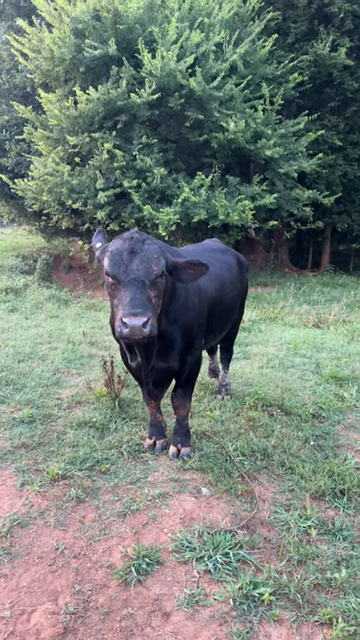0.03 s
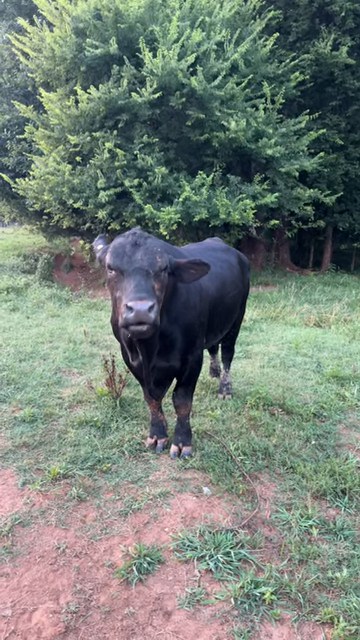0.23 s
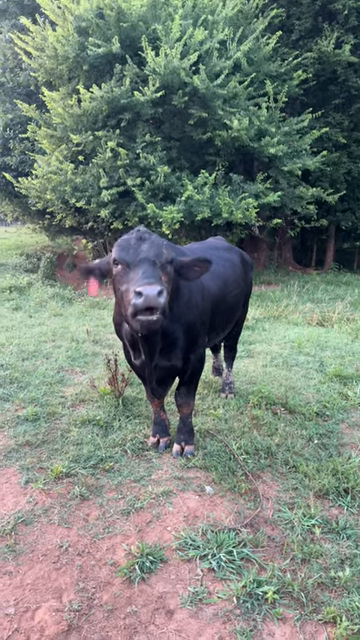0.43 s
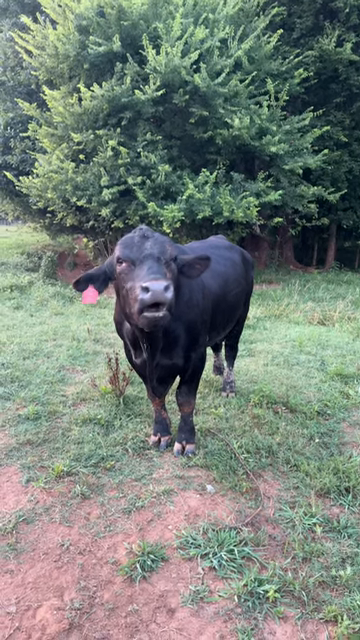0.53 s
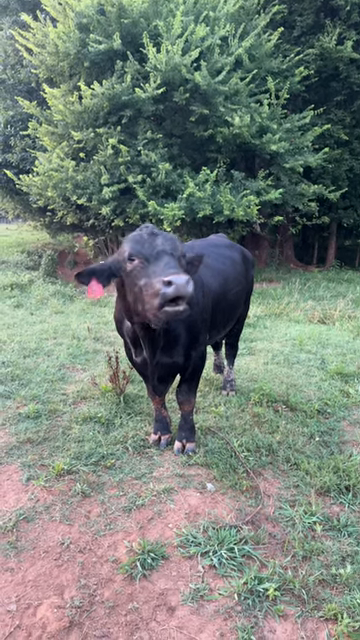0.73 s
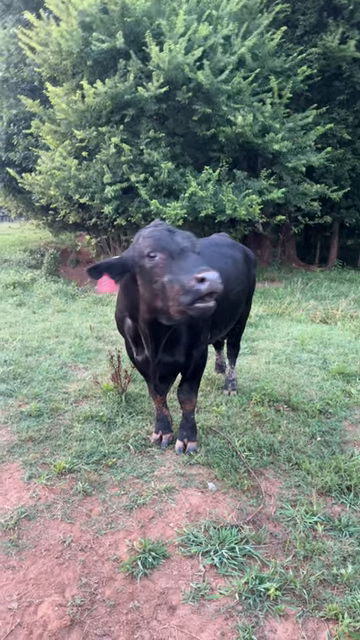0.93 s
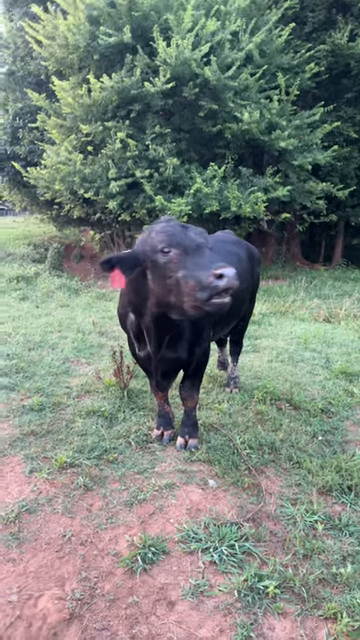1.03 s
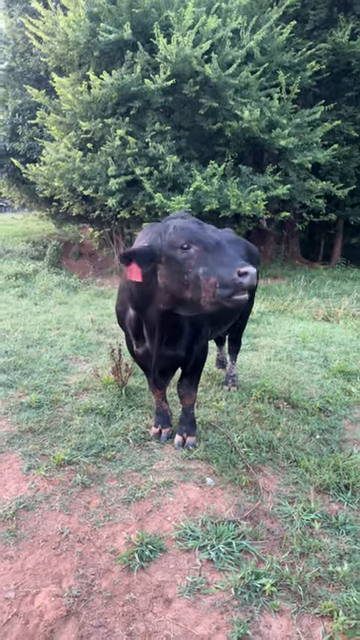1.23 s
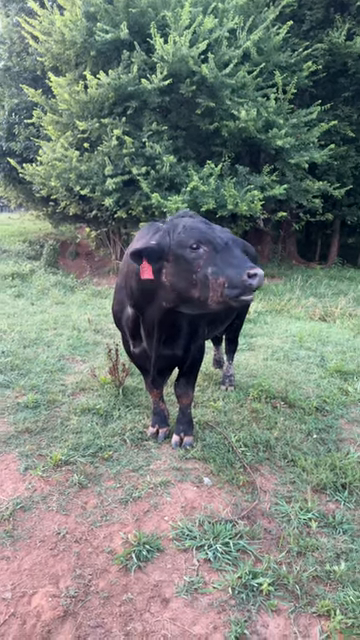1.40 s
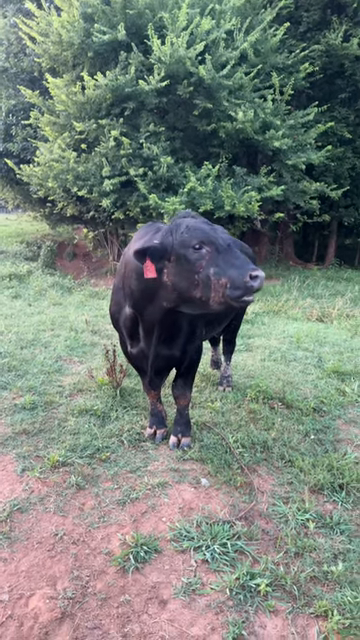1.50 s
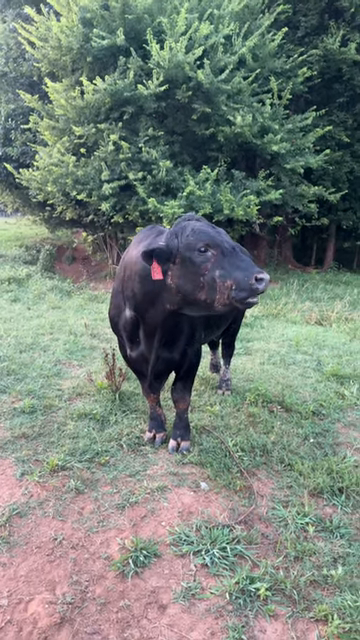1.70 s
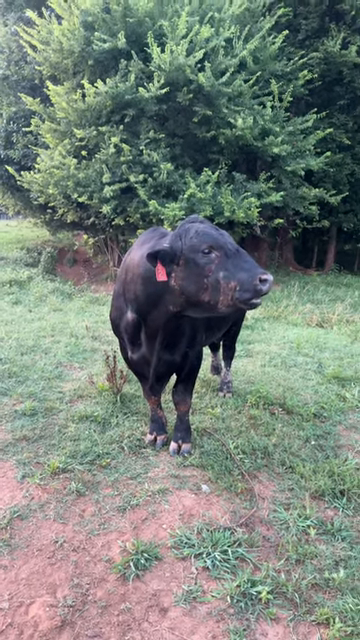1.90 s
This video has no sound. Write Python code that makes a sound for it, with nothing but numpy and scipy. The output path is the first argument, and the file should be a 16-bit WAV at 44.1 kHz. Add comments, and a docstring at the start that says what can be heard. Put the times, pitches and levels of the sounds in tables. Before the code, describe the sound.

A bull bellows once a few metres away in an open pasture, starting rough, holding a deep booming note and ending in a short rattle. Faint insect hiss and a distant engine continue, and a bird chirps twice.

```python
"""A pasture: one bull bellows a few metres away. A soft closed-mouth hum and a wet lip click lead to
a rough onset, a long booming note that sags as the mouth closes, and a short rattle on release.
Vocal-fold pulses and turbulent air ring the throat and nose; slack folds flap to make the growls.
Behind it a bird slurs down twice, an animal calls far off, insects hiss and a distant engine drones."""
import sys
import numpy as np
from scipy import signal
from scipy.fft import rfft, irfft
from scipy.io import wavfile

SR = 44100
rng = np.random.default_rng(int(sys.argv[2]) if len(sys.argv) > 2 else 0)


def master_out(mix):
    """Clip the mix to full scale and print it as 16-bit PCM to the path in sys.argv[1]."""
    frames = np.transpose(np.atleast_2d(mix))
    ceiling = np.clip(frames, -1, 1)
    pcm = np.round(ceiling * 32767).astype(np.int16)
    wavfile.write(sys.argv[1], SR, pcm)


N = 85995
T = np.arange(N) / SR

# Open air and insect spectrum: freq_hz, gain_db
FIELD_SPECTRUM = [(33, -32.5), (42, -9.5), (52, 12.5), (110, 2.5), (200, 5), (340, -7.5), (600, -4),
                  (1000, -11.5), (1800, -18.5), (2800, -18.5), (4300, -9.5), (5000, -18.5), (5800, -13.5),
                  (6800, -30.5), (8300, -23), (10000, -36.5), (15500, -52)]
# Engine partials: freq_hz, level_db
ENGINE_PARTIALS = [(77.4, -57), (102.7, -50.5), (128.6, -57.5), (155, -63.5), (204, -62.5)]
# Bird slurs: start_s, length_s, from_hz, to_hz, level_db
BIRD_SLURS = [(1.342, .046, 2970, 2230, -59.5), (1.691, .066, 3080, 2040, -58)]
# Far animal hoots: start_s, length_s, peak_pitch_hz, level_db
HOOTS = [(1.686, 0.082, 283, -58), (1.779, 0.042, 267, -64.5)]
# Hoot partials: pitch_ratio, gain_db
HOOT_PARTIALS = [(2, 7.5), (4, 0), (4.85, -3.5)]

# Vocal-fold pitch: time_s, pitch_hz
FOLD_PITCH = [(.16, 93.6), (.2, 100.7), (.25, 105.8), (.31, 108), (.38, 109.6), (.48, 110.3), (.62, 109.5),
              (.84, 107.3), (.96, 105.5), (1.08, 103.6), (1.16, 100.9), (1.2, 99.3), (1.228, 93.4),
              (1.255, 88)]
# Vocal effort and mouth opening: time_s, effort_db, open_fraction
EFFORT_AND_MOUTH = [(.17, -64, 0.4), (.22, -1.5, 0.16), (.3, 0.5, 0.29), (.39, 3.5, 0.58), (.47, 4.5, 0.65),
                    (.62, 1, 1), (.85, 1, 1), (.97, 1, 0.79), (1.08, -0.5, 0.64), (1.16, -1.5, 0.44),
                    (1.21, 1.5, 0), (1.25, -4, 0), (1.27, -43, 0.13)]
# Lip whistle bands: centre_hz, gain_db
WHISTLE_BANDS = [(5480, -65.5), (8800, -70), (12850, -74)]
# Lip whistle envelope: time_s, gain_db
WHISTLE_ENVELOPE = [(1.125, -21.5), (1.15, 4.5), (1.22, -8.5), (1.28, -13.5)]
# Wet mouth smacks: start_s, level_db, decay_s, highpass_hz
SMACKS = [(0.121, -42, 0.014, 1810), (0.134, -46, 0.019, 917), (1.136, -60, 0.049, 4930),
          (1.35, -71, 0.11, 7000)]
# Smack spectrum: freq_hz, gain_db
SMACK_SPECTRUM = [(500, -9), (1000, -4), (1380, 13.5), (1650, -5), (2400, 7.5), (3200, -20.5), (4300, -7.5),
                  (8500, -10), (12000, -15.5), (15500, -19.5)]
# Throat resonance flares: start_s, length_s, freq_hz, level_db
GRUNT_FLARES = [(.174, 0.016, 1095, -34), (0.182, 0.021, 545, -24.5), (0.193, 0.02, 1076, -34.5),
                (0.23, 0.052, 750, -28.5), (.462, 0.079, 186.5, -31), (1.286, 0.039, 763, -37.5),
                (1.362, 0.021, 204, -35.5), (1.435, 0.073, 192.5, -42.5)]
# Growl as the folds start: time_s, level_db
ONSET_ENVELOPE = [(.105, -54), (.125, -40.5), (.169, -50.5), (.182, -28.5), (.236, -26.5), (.275, -34),
                  (.33, -38), (.42, -63)]
# Mouth resonances at onset: centre_hz, width_hz, gain_db
ONSET_MODES = [(294, 180, 0), (512, 103, 4), (701, 150, 0), (847, 21, -1), (1111, 32, -16),
               (1400, 25, -9.5)]
# Growl as the folds stop: time_s, level_db
RELEASE_ENVELOPE = [(1.1, -55.5), (1.17, -33.5), (1.235, -43), (1.28, -32), (1.308, -35.5), (1.318, -52),
                    (1.42, -51), (1.55, -72)]
# Mouth resonances at release: centre_hz, width_hz, gain_db
RELEASE_MODES = [(223, 44, 10), (470, 130, -4.5), (735, 100, -0.5), (997, 80, -4.5), (1350, 60, -10.5),
                 (1760, 82, -14), (2120, 80, -26)]
# Throat turbulence spectrum: freq_hz, gain_db
TURBULENCE_SPECTRUM = [(60, -23), (130, 0), (185, 7), (300, -2), (370, -15), (470, -1), (620, -15),
                       (850, -7.5), (1300, -13), (1520, -29), (2200, -23.5), (2700, -36), (4200, -45),
                       (15000, -45.5)]
# Mouth hiss envelope: time_s, level_db
HISS_ENVELOPE = [(.03, -61), (.07, -57.5), (.16, -58.5), (.2, -53), (.27, -66.5), (.42, -58), (.68, -54.5),
                 (.82, -67.5), (1, -83.5)]
# Mouth hiss spectrum: freq_hz, gain_db
HISS_SPECTRUM = [(200, -6.5), (1300, 5.5), (1600, -4), (2400, 1), (4200, -0.5), (6000, -5), (7000, -10),
                 (11000, -16), (15500, -22.5)]
# Open-mouth rasp envelope: time_s, level_db
RASP_ENVELOPE = [(.28, -59.5), (.37, -41), (.59, -44), (.71, -48), (.9, -45.5), (1.12, -62.5)]
# Open-mouth resonances: centre_hz, width_hz, gain_db
OPEN_MOUTH_MODES = [(742, 110, -5), (1090, 120, -2), (1264, 92, -1)]
# Resonance sliding with the jaw: time_s, centre_hz, level_db
JAW_SLIDE = [(.26, 2620, -64.5), (.38, 2494, -56), (.41, 2330, -55.5), (.47, 2207, -59.5), (.56, 2140, -64),
             (.85, 2225, -74)]
# Nasal ring envelope: time_s, gain_db
NASAL_ENVELOPE = [(.24, -25), (.33, -12.5), (.39, -2.5), (.7, -1), (.9, -3.5), (1.05, -4.5), (1.2, -9.5),
                  (1.26, -13.5)]
# Nasal resonances: centre_hz, width_hz, shut_gain_db, open_gain_db, noise_ratio
NASAL_MODES = [(1716, 83, -43.5, -48, 0.43), (1946, 57, -48, -58, 0.7), (2435, 27, -58, -59.5, 0.6),
               (2969, 93, -69.5, -57.5, .4), (5950, 180, -95, -71, .3), (8200, 260, -92, -72, .15),
               (9570, 520, -76, -79, .2), (12000, 350, -92.5, -80.5, .2)]
# Throat resonances: centre_hz, half_width_hz, shut_gain_db, half_open_gain_db, open_gain_db
THROAT_MODES = [(296.2, 26.7, -28, -34, -36), (432.3, 20, -48, -31, -27.5), (524.6, 14, -31, -33.5, -57),
                (657, 11, -52.5, -43, -45), (768.3, 25, -49, -33, -35), (785, 18.1, -36.5, -37, -65),
                (953, 6.4, -63.5, -52.3, -57.5), (1066, 30.9, -54, -47, -45),
                (1181.7, 4.8, -69.5, -66.5, -50.5), (1264, 33, -72, -49, -55),
                (1396, 14.0, -63.5, -59, -70)]
# First harmonic: time_s, level_db
HUM_ENVELOPE = [(.04, -99), (.075, -37.5), (.125, -34), (.18, -29), (.215, -56), (.31, -30.5), (.7, -32.5),
                (1.15, -37), (1.23, -43.5), (1.28, -97)]
# Second harmonic: time_s, level_db
BOOM_ENVELOPE = [(.05, -46.5), (.17, -57.5), (.195, -26), (.22, -30.5), (.28, -25.5), (.37, -16),
                 (.46, -14), (.6, -11.5), (.88, -12.5), (1.08, -12), (1.2, -10.5), (1.235, -15),
                 (1.254, -32.5), (1.33, -71)]


def undb(db):
    return 10 ** (np.asarray(db) / 20)


def unit_rms(x):
    return x / np.sqrt(np.mean(x ** 2))


def curve(rows, column=1):
    """Table column interpolated over time."""
    rows = np.array(rows)
    return np.interp(T, rows[:, 0], rows[:, column])


def envelope(rows):
    """Gain from a dB curve, zero outside it."""
    return undb(curve(rows)) * (T > rows[0][0]) * (T < rows[-1][0])


def progress(start_s, length_s):
    return np.clip((T - start_s) / length_s, 0, 1)


def butter(x, order, cutoff_hz, kind="low"):
    return signal.sosfilt(signal.butter(order, cutoff_hz, kind, fs=SR, output="sos"), x)


def wander(rate_hz):
    """Smooth random signal, rms 1."""
    return unit_rms(butter(rng.standard_normal(2 * N), 2, rate_hz)[N:])


def noise(spectrum):
    """Coloured noise, rms 1."""
    hz, db = np.array(spectrum).T
    bins_hz = np.maximum(np.fft.rfftfreq(N, 1 / SR), 1)
    gain = undb(np.interp(np.log(bins_hz), np.log(hz), db))
    return unit_rms(irfft(rfft(rng.standard_normal(N)) * gain, N))


def ring(x, hz, width_hz):
    """Two identical resonators in series, unity gain at centre."""
    b, a = signal.iirpeak(hz, hz / width_hz, fs=SR)
    return signal.lfilter(b, a, signal.lfilter(b, a, x))


def ring_modes(x, modes):
    return sum(undb(db) * ring(x, hz, width_hz) for hz, width_hz, db in modes)


def phase_rad(hz):
    return 2 * np.pi * np.cumsum(hz) / SR


def fold_pulses(phase, harmonics, scatter_rad=.006):
    """One pulse per cycle, treble smeared in time; rms 1 per harmonic."""
    return np.sqrt(2) * sum(np.cos(k * phase - scatter_rad * k ** 3) for k in range(1, harmonics + 1))


def air_and_insects(level_db=-53, flicker_db=1):
    """Open air and insect hiss, flickering slightly."""
    return noise(FIELD_SPECTRUM) * undb(level_db + flicker_db * wander(14))


def engine(drift=.006, throb_db=1):
    """Distant drone: partials drift together and throb separately."""
    rad_per_hz = phase_rad(1 + drift * wander(10))
    out = 0
    for hz, db in ENGINE_PARTIALS:
        gain = np.sqrt(2) * undb(db + throb_db * wander(6.6))
        out += gain * np.sin(hz * rad_per_hz + 2 * np.pi * rng.random())
    return out


def far_animal(waver=.0091, arch_depth=.19):
    """Hoots that arch in pitch and level."""
    out = 0
    for start_s, length_s, hz, db in HOOTS:
        arch = np.sin(np.pi * progress(start_s, length_s))
        phase = phase_rad(hz * (1 + arch_depth * (arch - 1) + waver * wander(58)))
        tone = sum(undb(gain_db) * np.sin(ratio * phase) for ratio, gain_db in HOOT_PARTIALS)
        out += undb(db) * arch * tone
    return out


def bird(waver=.0091):
    """Falling whistled slurs."""
    out = 0
    for start_s, length_s, from_hz, to_hz, db in BIRD_SLURS:
        along = progress(start_s, length_s)
        pitch_hz = (from_hz + (to_hz - from_hz) * along ** 2) * (1 + waver * wander(130))
        out += undb(db) * np.sqrt(np.abs(np.sin(np.pi * along))) * np.sin(phase_rad(pitch_hz))
    return out


def tree_echo(x, gain_db=-26, t60_s=.2, rise_s=.05):
    """Faint scatter from the tree line."""
    tail = rng.standard_normal(N) * undb(-60 * T / t60_s) * np.minimum(T / rise_s, 1)
    return undb(gain_db) * signal.fftconvolve(x, tail / np.linalg.norm(tail))[:N]


def lip_whistle(width_hz=50):
    """Air whistles thinly through the closing lips."""
    bands = (undb(db) * unit_rms(ring(rng.standard_normal(N), hz, width_hz)) for hz, db in WHISTLE_BANDS)
    return envelope(WHISTLE_ENVELOPE) * sum(bands)


def lip_smacks(crackle_db=2, attack_s=.004):
    """The wet mouth crackles as it opens and shuts."""
    out = 0
    for start_s, db, decay_s, highpass_hz in SMACKS:
        age_s = np.maximum(T - start_s, 0)
        shape = np.minimum(age_s / attack_s, 1) * np.exp(-np.maximum(age_s - attack_s, 0) / decay_s)
        crackle = noise(SMACK_SPECTRUM) * undb(crackle_db * wander(400))
        out += undb(db) * shape * unit_rms(butter(crackle, 2, highpass_hz, "high"))
    return out


def grunts():
    """Single throat resonances flare as the folds catch, strain and let go."""
    out = 0
    for start_s, length_s, hz, db in GRUNT_FLARES:
        shape = np.sin(np.pi * progress(start_s, length_s)) ** 2
        out += undb(db) * shape * np.sin(2 * np.pi * hz * (T - start_s))
    return out


def growl(levels, modes, lowpass_hz, jitter, air_ratio):
    """Slack folds flap unevenly and ring the half-open mouth."""
    phase = phase_rad(curve(FOLD_PITCH) * (1 + jitter * wander(70)))
    air = (1 + np.cos(phase)) * rng.standard_normal(N)
    flaps = unit_rms(fold_pulses(phase, harmonics=29)) + air_ratio * air
    mouth = lambda x: butter(ring_modes(x, modes), 8, lowpass_hz)
    return mouth(flaps * envelope(levels)) / np.std(mouth(flaps))


def breath(puffs, opening, turbulence_db=-43, shut_gain_db=-1):
    """Throat turbulence and mouth hiss, pulsed by the folds."""
    gain = envelope(EFFORT_AND_MOUTH) * undb(turbulence_db + shut_gain_db * (1 - opening))
    turbulence = gain * noise(TURBULENCE_SPECTRUM)
    hiss = envelope(HISS_ENVELOPE) * noise(HISS_SPECTRUM)
    return puffs * (turbulence + hiss)


def rasp(puffs, flare_db=2.5):
    """Uneven flares of turbulence ring the open mouth."""
    jet = puffs * rng.standard_normal(N) * undb(flare_db * wander(25))
    return envelope(RASP_ENVELOPE) * unit_rms(ring_modes(jet, OPEN_MOUTH_MODES))


def jaw_ring(phase, half_width_hz=40):
    """A resonance slides down as the jaw drops, lifting harmonics in turn."""
    centre_hz, pitch_hz = curve(JAW_SLIDE), curve(FOLD_PITCH)
    level = envelope([(time_s, db) for time_s, _, db in JAW_SLIDE])
    gain = lambda hz: 1 / (1 + ((hz - centre_hz) / half_width_hz) ** 4)
    return np.sqrt(2) * level * sum(gain(k * pitch_hz) * np.cos(k * phase) for k in range(17, 30))


def nose(phase, puffs, opening, flutter_db=2):
    """Fold pulses and puffs of air ring the nose; mouth opening sets the balance."""
    pulses = fold_pulses(phase, harmonics=124)
    out = 0
    for hz, width_hz, shut_db, open_db, noise_ratio in NASAL_MODES:
        gain = undb(shut_db + opening * (open_db - shut_db) + flutter_db * wander(42))
        air = unit_rms(ring(puffs * rng.standard_normal(N), hz, width_hz))
        out += gain * (ring(pulses, hz, width_hz) + noise_ratio * air)
    return envelope(NASAL_ENVELOPE) * out


def throat(phase, opening, smear_rad=.55):
    """Throat resonances weight harmonics 3-15 and spread each pulse over its cycle."""
    pitch_hz = curve(FOLD_PITCH)
    out = 0
    for hz, half_width_hz, *gains_db in THROAT_MODES:
        peak_gain = undb(np.interp(opening, [0, .5, 1], gains_db))
        for k in range(3, 16):
            gain = peak_gain / (1 + ((k * pitch_hz - hz) / half_width_hz) ** 2)
            out += gain * np.cos(k * phase - smear_rad * (k - 4) ** 2)
    return np.sqrt(2) * envelope(EFFORT_AND_MOUTH) * out


def hum_and_boom(phase, shimmer_db=.15):
    """The folds' two lowest harmonics; the second carries the boom."""
    hum = envelope(HUM_ENVELOPE) * np.cos(phase)
    boom = envelope(BOOM_ENVELOPE) * np.cos(2 * phase)
    return np.sqrt(2) * (hum + boom) * undb(shimmer_db * wander(33))


def bellow(jitter=.0018, puff_depth=.41):
    """Steadily vibrating folds voice the note and chop the breath into puffs."""
    phase = phase_rad(curve(FOLD_PITCH) * (1 + jitter * wander(67)))
    opening = curve(EFFORT_AND_MOUTH, column=2)
    puffs = 1 + puff_depth * np.cos(phase)
    voice = hum_and_boom(phase) + throat(phase, opening) + nose(phase, puffs, opening) + jaw_ring(phase)
    return voice + breath(puffs, opening) + rasp(puffs)


def scene():
    onset = growl(ONSET_ENVELOPE, ONSET_MODES, lowpass_hz=1340, jitter=.03, air_ratio=.35)
    release = growl(RELEASE_ENVELOPE, RELEASE_MODES, lowpass_hz=2130, jitter=.05, air_ratio=.45)
    bull = onset + bellow() + release + lip_whistle() + lip_smacks() + grunts()
    return (bull + tree_echo(bull) + bird() + far_animal() + engine() + air_and_insects())[None]


def record(dry, cutoff_hz=15800):
    """Steep low-pass on the top treble."""
    return signal.sosfilt(signal.ellip(10, .1, 80, cutoff_hz, fs=SR, output="sos"), dry)


dry = scene()
out = record(dry)
master_out(out)
```